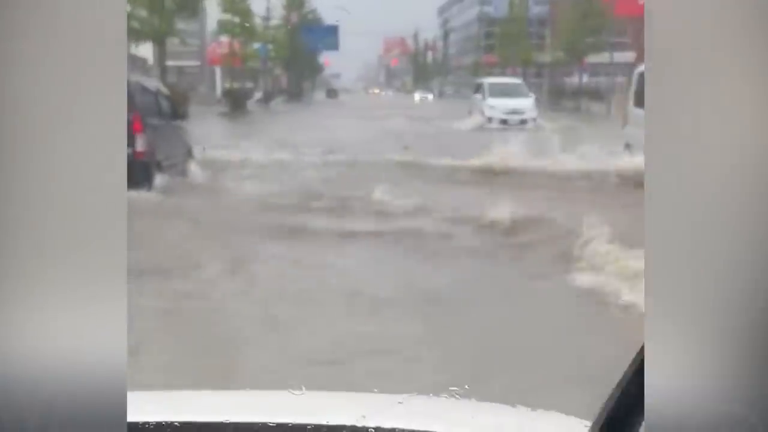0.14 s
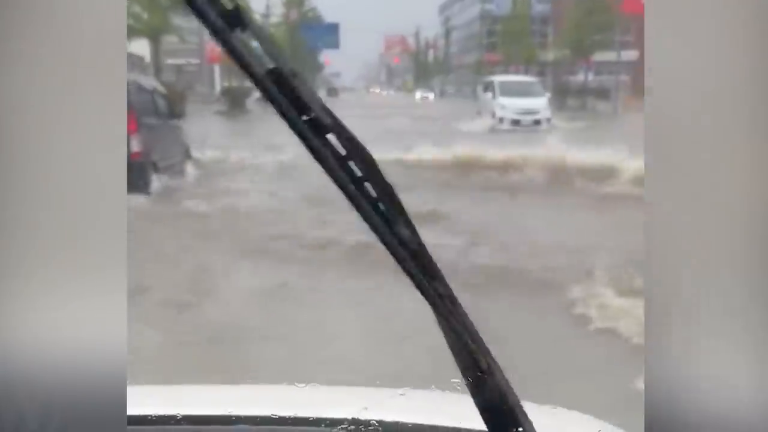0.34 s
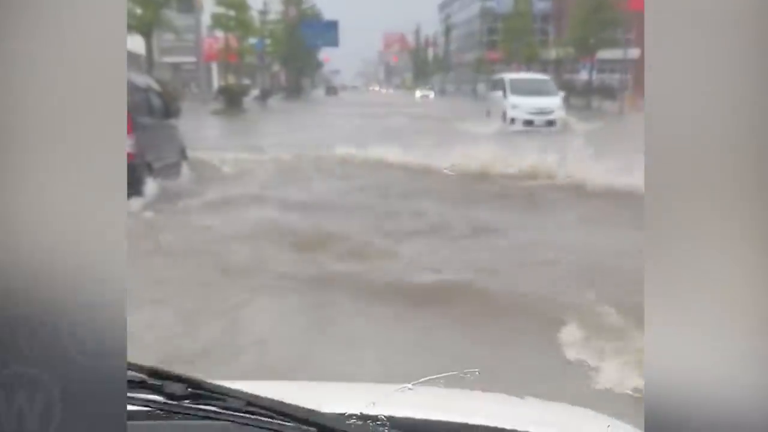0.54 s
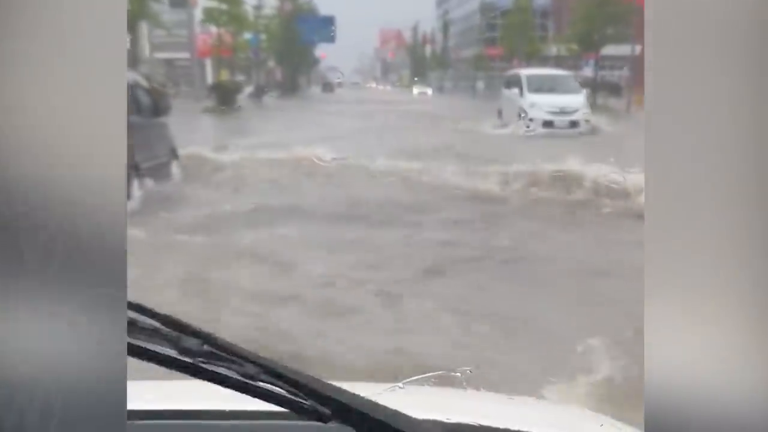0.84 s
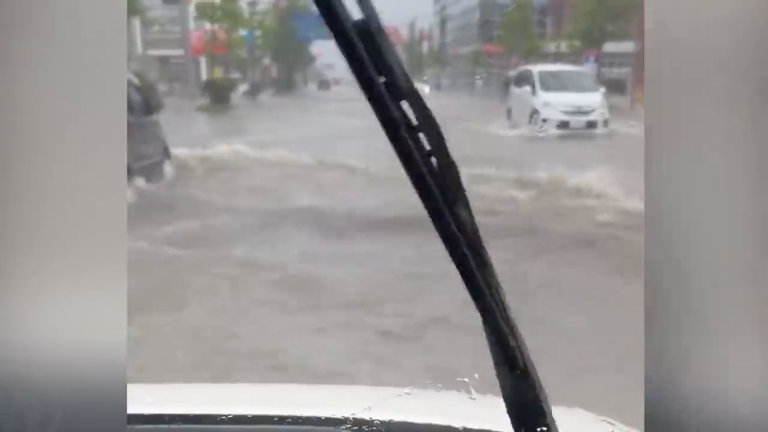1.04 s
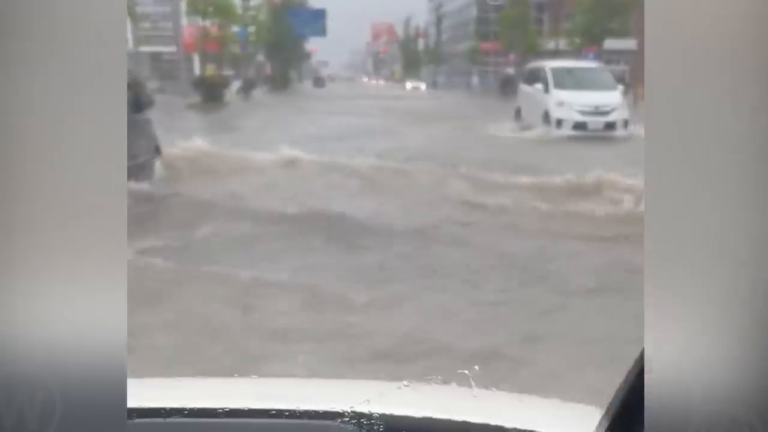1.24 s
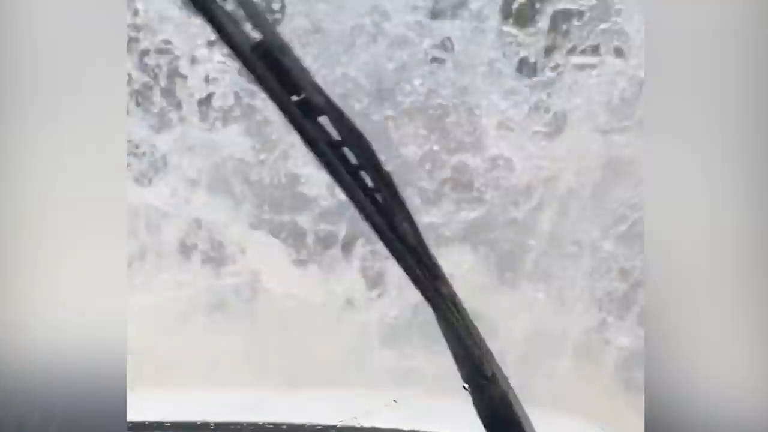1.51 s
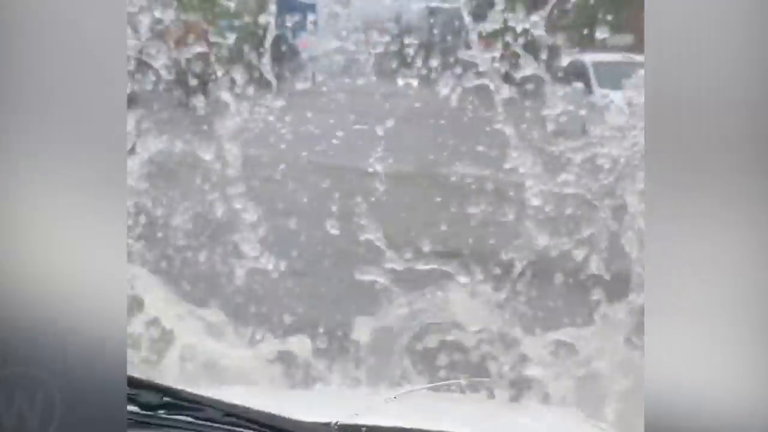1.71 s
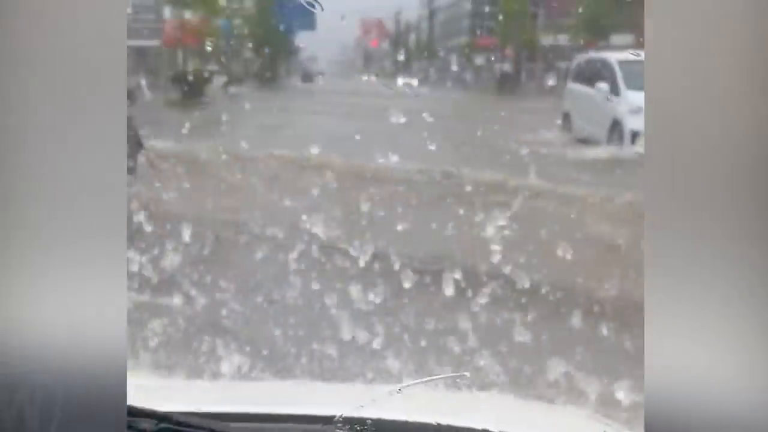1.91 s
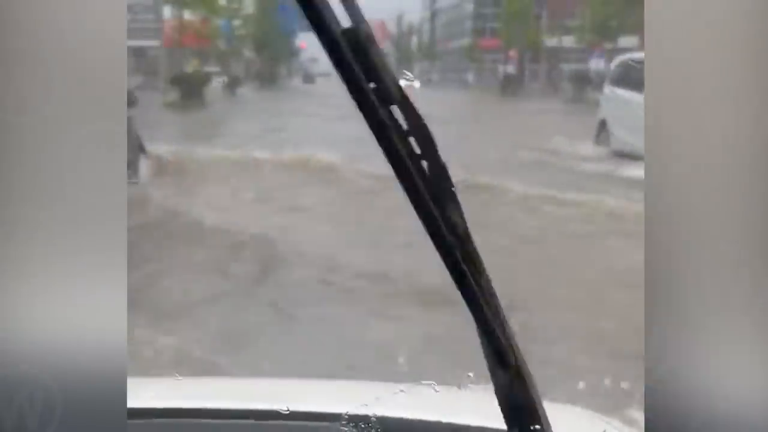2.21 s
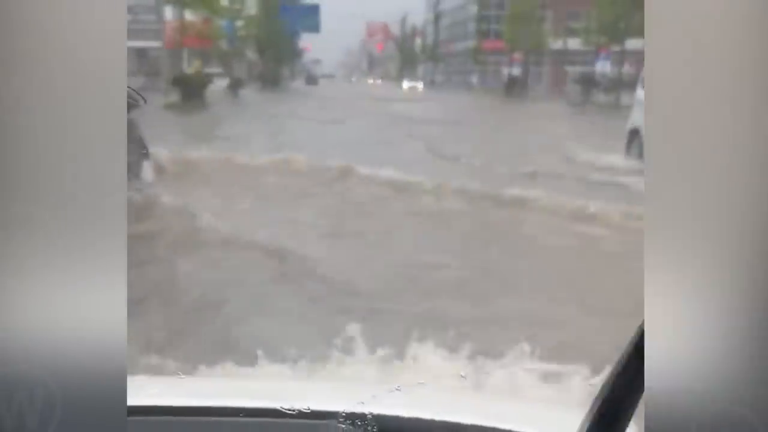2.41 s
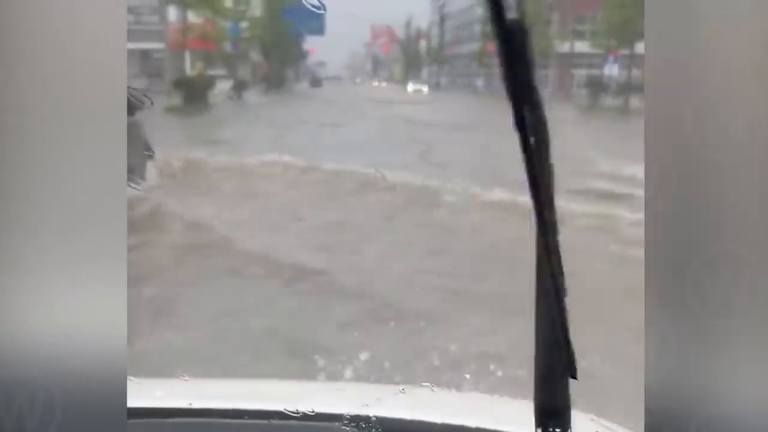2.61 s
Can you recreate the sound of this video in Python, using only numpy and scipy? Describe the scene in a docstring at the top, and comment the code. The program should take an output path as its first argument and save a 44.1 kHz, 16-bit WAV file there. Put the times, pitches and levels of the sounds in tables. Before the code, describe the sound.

Low, boomy rumble of a car driving through a flooded street, with water thumping the floor

```python
"""An engine drones under load and eases off, heard inside a car that wades through a flooded street.
It is a stack of sine waves. Water, made of filtered noise, rumbles under the floor pan and washes
through the wheel arches, and lumps of it thump the floor as short dying swings.
Midway a wave bursts over the bonnet and its spray patters on the windscreen as tiny ringing clicks.
Rain hisses on the glass, and a wiper blade squeals faintly at the start."""
import sys
import numpy as np
from scipy import signal
from scipy.fft import rfft, irfft, next_fast_len
from scipy.io import wavfile

SR = 44100
rng = np.random.default_rng(int(sys.argv[2]) if len(sys.argv) > 2 else 0)


def digitize_waveform(pressure):
    """Quantize a signal to 16-bit integers and store it at the path in sys.argv[1].

    Rows of a 2-D input are taken as channels; values are limited to [-1, 1].
    """
    field = np.atleast_2d(pressure).T
    bounded = np.clip(field, -1, 1)
    quanta = np.round(bounded * 32767).astype(np.int16)
    wavfile.write(sys.argv[1], SR, quanta)


N = 121275
T = np.arange(N) / SR   # time of every sample, s


def from_db(db):
    """Turn decibels into a gain."""
    return 10 ** (np.asarray(db) / 20)


def rms_one(x):
    """Scale a sound to an average strength (rms) of 1."""
    return x / np.sqrt(np.mean(x ** 2) + 1e-20)


def in_time(rows):
    """Join the points of a (time, value) table with straight lines, one value per sample."""
    return np.interp(T, *np.transpose(rows))


def at_hz(points, hz):
    """Read a (frequency, value) table with frequency on a log axis."""
    table_hz, values = np.transpose(points)
    return np.interp(np.log(hz), np.log(table_hz), values)


def drift(rate):
    """Slow random motion of spread 1, from noise smoothed twice; rate in Hz."""
    step, warm_up = 40, 2000   # one slow value per 40 samples; the first 2000 are dropped
    r = np.exp(-2 * np.pi * rate * step / SR)
    noise = rng.standard_normal(N // step + warm_up + 2)
    slow = rms_one(signal.lfilter([1], [1, -2 * r, r * r], noise)[warm_up:])
    return np.interp(np.arange(N) / step, np.arange(len(slow)), slow)


def swell(start, rise, hold, fall):
    """A level that rises in a straight line, holds and dies away exponentially; all times in s."""
    attack = np.clip((T - start) / rise, 0, 1)
    return attack * np.exp(-np.maximum(T - start - rise - hold, 0) / fall)


def water_noise(spectrum, patchy_db, surge_db, flicker_rate):
    """Stereo noise in third-octave bands that surge together and flicker each on its own; rms 1."""
    # spread of the sound between left and right: (frequency [Hz], side minus mid [dB])
    width = [(55, -37.5), (110, -28), (180, -23), (280, -11.5), (450, -12), (850, -6), (1700, -10),
             (2600, -4), (4200, -5.5), (5200, -9.5), (6000, -28), (12000, -27)]
    edges = 20 * 2 ** (np.arange(30) / 3)
    surge = surge_db * drift(flicker_rate / 2)
    white = rng.standard_normal((2, 2, N + SR // 4))   # two mid and side pairs, used by turns
    out = 0
    for k, (low, high) in enumerate(zip(edges, edges[1:])):
        if high < spectrum[0][0] or low > spectrum[-1][0]:
            continue
        hz = np.sqrt(low * high)
        band = signal.butter(2, [low, high], "band", fs=SR, output="sos")
        mid, side = signal.sosfilt(band, white[k % 2])[:, -N:]
        stereo = mid + from_db(at_hz(width, hz)) * side * [[1], [-1]]
        flicker = patchy_db * drift(flicker_rate)
        out = out + from_db(at_hz(spectrum, hz) + surge + flicker) * stereo
    return rms_one(out)


def resonant_noise(hz, width_hz):
    """Noise passed twice through one resonance, so that it gathers around a pitch; rms 1."""
    r = np.exp(-np.pi * width_hz / SR)
    a = [1, -2 * r * np.cos(2 * np.pi * hz / SR), r * r]
    once = signal.lfilter([1, 0, -1], a, rng.standard_normal(N))
    return rms_one(signal.lfilter([1, 0, -1], a, once))


def grains(per_s, low_hz, high_hz, cycles, spread_db, tilt_db, pan_db, count):
    """Random clicks of uneven size, each ringing at one of many pitches; tilt is per octave; rms 1."""
    born = np.flatnonzero(rng.random(N) < per_s / SR)
    size = from_db(spread_db * np.minimum(rng.exponential(1, N), 4)) * rng.choice([-1, 1], N)
    dealt = rng.integers(0, count, N)   # which pitch each click gets
    pan = pan_db * rng.standard_normal(N)
    out = 0
    for k, hz in enumerate(np.geomspace(low_hz, high_hz, count)):
        at = born[dealt[born] == k]
        clicks = np.full((2, N), 1e-18)   # not quite zero, which keeps the filter fast
        clicks[:, at] = size[at] * from_db(pan[at] * [[.5], [-.5]])
        w = 2 * np.pi * hz / SR
        r = np.exp(-np.log(1000) * hz / (cycles * SR))   # fades by 60 dB over the given cycles
        ringing = signal.lfilter([0, np.sin(w)], [1, -2 * r * np.cos(w), r * r], clicks)
        out = out + from_db(tilt_db * np.log2(hz / low_hz)) * ringing
    return rms_one(out)


def engine():
    """Sines at multiples of the firing rate: the lowest booms with load, the overtones growl and waver."""
    # engine speed before jitter: (time [s], firing rate [Hz])
    speed = [(0, 58.62), (.3, 60.15), (.72, 62.24), (.88, 57.26), (1.3, 57.23), (1.65, 56.21), (2.0, 57.4),
             (2.25, 51.89), (2.75, 53.19)]
    # engine load, heard in the lowest harmonic: (time [s], relative level [dB])
    load = [(0, -23), (.06, -20), (.14, -14.5), (.3, -20.5), (.45, -17.5), (.59, -19.5), (.65, -36),
            (.71, -32.5), (.76, -16.5), (.9, -25), (.99, -39), (1.06, -21.5), (1.25, -16.5), (1.35, -19),
            (1.49, -24), (1.62, -19.5), (1.76, -34), (1.99, -29.5), (2.2, -31.5), (2.43, -26), (2.75, -25)]
    # growl of the overtones: (time [s], relative level [dB])
    growl = [(0, -21), (.25, -18.5), (.6, -21.5), (1.0, -22.5), (1.25, -24), (1.65, -19.5), (1.85, -28),
             (2.75, -25.5)]
    # engine harmonics: (multiple of the firing rate, relative level [dB])
    harmonics = [(1, 0), (2, -11), (3, -12.5), (4, -20), (5, -32), (6, -35)]
    engine_db, waver_db = -1.5, 1.5
    firing_hz = in_time(speed) * (1 + 0.0074 * drift(10.1))   # uneven by 0.74 %
    phase = 2 * np.pi * np.cumsum(firing_hz) / SR
    out = 0
    for multiple, db in harmonics:
        level = in_time(load) if multiple == 1 else in_time(growl) + waver_db * drift(3.74)
        tone = np.sqrt(2) * np.sin(multiple * phase + 2 * np.pi * rng.random())   # rms 1
        out = out + from_db(engine_db + db + level) * tone
    return out


def floor_pan():
    """Churning water rumbles under the floor and roars along the sills; passing waves make the shell boom."""
    # water churning against the floor pan: (time [s], relative level [dB])
    buffet = [(0, -26.5), (.2, -25.5), (.6, -28), (.7, -27), (.92, -25), (1.3, -25), (1.65, -26),
              (1.85, -27), (2.15, -28), (2.3, -28), (2.42, -30.5), (2.6, -27), (2.75, -27)]
    # colour of the rumble: (frequency [Hz], relative level per Hz [dB])
    rumble_colour = [(40, -18.5), (55, -4.5), (72, 1), (100, 0.5), (140, -5.5), (190, -8.5), (270, -20.5),
                     (400, -33.5)]
    # waves heaving against the body: (time [s], level [dB])
    heave = [(0, -34.5), (.8, -34), (1.0, -35.5), (1.25, -30.5), (1.55, -32), (1.85, -34.5), (2.22, -35.5),
             (2.45, -31), (2.75, -30.5)]
    # colour of the boom: (frequency [Hz], relative level per Hz [dB])
    boom_colour = [(22, -23.5), (33, -13.5), (46, 2.5), (58, -3), (75, -12)]
    # water roaring along the sills: (time [s], level [dB])
    roar_level = [(0, -48.5), (.22, -35.5), (.65, -36), (.8, -37.5), (.95, -36.5), (1.15, -39.5),
                  (1.32, -41), (1.47, -37), (1.7, -37.5), (1.85, -42), (2.08, -39.5), (2.35, -41),
                  (2.62, -38.5), (2.75, -41.5)]
    # colour of the roar: (frequency [Hz], relative level per Hz [dB])
    roar_colour = [(190, -3.5), (240, 1), (310, -7), (410, -8.5), (520, -20)]
    rumble = water_noise(rumble_colour, patchy_db=0.0, surge_db=0.76, flicker_rate=12)
    boom = water_noise(boom_colour, patchy_db=3.0, surge_db=2.5, flicker_rate=4.8)
    roar = water_noise(roar_colour, patchy_db=0.5, surge_db=1.0, flicker_rate=14)
    out = from_db(0.96 + in_time(buffet)) * rumble
    out = out + from_db(in_time(heave)) * boom
    return out + from_db(in_time(roar_level)) * roar


def thumps():
    """Each lump of water pushes the floor pan, which swings a few cycles and dies."""
    # lumps of water hitting the floor pan: (time [s], pitch [Hz], peak level [dB])
    hits = [(.068, 139.5, -19), (.618, 165.4, -19), (0.753, 94.4, -16.5), (1.544, 77, -19.5),
            (1.682, 65, -14), (1.748, 130.5, -19.5), (1.924, 80.5, -18), (1.978, 58.16, -16),
            (2.057, 84, -21.5), (2.106, 68, -13.5), (2.268, 90, -21), (2.4, 56.4, -13), (2.458, 59.35, -14),
            (2.555, 95, -22), (2.587, 128, -18.5), (2.634, 78.7, -14.5), (2.7, 66, -21)]
    rise_s = 0.009
    out = 0
    for start, hz, db in hits:
        age = np.maximum(T - start, 0)
        push = age / rise_s * np.exp(1 - age / rise_s)   # reaches 1 after rise_s, then dies
        out = out + from_db(db) * push * np.sin(2 * np.pi * hz * age)
    return out


def wheel_arches():
    """A steady wash of noise, the ring of the arch as resonant noise, and bubbles gurgling as short rings."""
    # water flowing in the wheel arches: (time [s], relative level [dB])
    flow = [(0, -44.5), (.3, -44.5), (.6, -45), (.85, -44), (1.2, -44.5), (1.62, -44), (1.78, -45.5),
            (2.15, -46), (2.45, -48), (2.57, -46), (2.75, -43.5)]
    # colour of the wash: (frequency [Hz], relative level per Hz [dB])
    wash_colour = [(250, -5.5), (400, -1.5), (500, -0.5), (720, -1), (900, -5.5), (1100, -6.5), (1700, -10),
                   (2400, -18.5), (3500, -28.5), (5000, -23.5)]
    wash_db, ring_db, gurgle_db = 0.1, -13.5, -6
    wash = water_noise(wash_colour, patchy_db=1.5, surge_db=.5, flicker_rate=12.7)
    ring = resonant_noise(1083, width_hz=110)
    gurgle = grains(200, low_hz=296, high_hz=2340, cycles=20, spread_db=6.0, tilt_db=-7.0,
                    pan_db=5.5, count=22)
    mix = from_db(wash_db) * wash + from_db(ring_db) * ring + from_db(gurgle_db) * gurgle
    return from_db(in_time(flow)) * mix


def spray_burst():
    """The wave's spray arrives, holds and runs off."""
    return swell(1.27, rise=0.07, hold=0.13, fall=.05)


def wave():
    """A wave breaks over the car: fine spray, a dull pour on the bonnet and a soft slap on the glass."""
    # colour of the fine spray: (frequency [Hz], relative level per Hz [dB])
    spray_colour = [(1000, 4), (1600, 8.5), (2500, 2), (4500, 1.5), (8000, -6.5), (13000, -12)]
    # colour of the bulk pouring over the bonnet: (frequency [Hz], relative level per Hz [dB])
    pour_colour = [(200, 2), (300, 1), (480, -1), (680, 3), (1000, -12), (1600, -15), (2500, -25.5)]
    # colour of the crest slapping the glass: (frequency [Hz], relative level per Hz [dB])
    slap_colour = [(200, 1), (350, 2), (700, -9), (1500, -5), (3000, -10), (6000, -22), (12000, -30)]
    spray_db, pour_db, slap_db = -54, -43, -43.5
    spray = water_noise(spray_colour, patchy_db=1.0, surge_db=.7, flicker_rate=40)
    pour = water_noise(pour_colour, patchy_db=1.0, surge_db=.7, flicker_rate=40)
    slap = water_noise(slap_colour, patchy_db=1.0, surge_db=.7, flicker_rate=40)
    out = from_db(spray_db) * spray_burst() * spray
    out = out + from_db(pour_db) * swell(1.35, rise=0.03, hold=0.18, fall=0.06) * pour
    return out + from_db(slap_db) * swell(1.472, rise=.022, hold=0, fall=0.028) * slap


def splashes():
    """Sheets of water slap the body, each a short burst of noise around its own pitch."""
    # splashes against the body: (time [s], centre frequency [Hz], level [dB])
    slaps = [(.09, 1500, -53), (0.921, 520, -46), (1.40, 1279, -52), (1.41, 680, -43), (1.453, 289, -36.5),
             (1.514, 776, -47), (1.536, 285, -39.5), (1.575, 720, -45.5), (1.68, 710, -48.5),
             (2.14, 3000, -58), (2.52, 1379, -51), (2.565, 750, -45), (2.671, 890, -54)]
    out = 0
    for start, hz, db in slaps:
        burst = swell(start, rise=.006, hold=0.0076, fall=.018)
        out = out + from_db(db) * burst * resonant_noise(hz, width_hz=0.66 * hz)
    return out


def windscreen():
    """Rain hisses and ticks on the glass; the ticks crowd together while the spray lands."""
    # rain and spray hissing on the glass: (time [s], relative level [dB])
    hiss_level = [(0, 0), (.25, -1), (.6, -1), (.82, 0), (1.2, 0.8), (1.7, -0.5), (2.15, -0.5), (2.3, -1),
                  (2.75, -1)]
    # colour of the hiss: (frequency [Hz], relative level per Hz [dB])
    hiss_colour = [(1500, -12.5), (2100, -1.5), (2650, 2.5), (3200, -3), (3900, -4.5), (4700, -3),
                   (6000, -10.5), (8000, -10), (10500, -22), (12500, -17.5), (15000, -21)]
    hiss_db, drops_db = -55.5, -72
    hiss = water_noise(hiss_colour, patchy_db=1.0, surge_db=.5, flicker_rate=10)
    drops_per_s = 450 * (1 + 6.2 * spray_burst())   # the spray adds up to 6.2 times the rain's drops
    drops = grains(drops_per_s, low_hz=2000, high_hz=8000, cycles=14, spread_db=3.5, tilt_db=0,
                   pan_db=1, count=14)
    return from_db(hiss_db + in_time(hiss_level)) * hiss + from_db(drops_db) * drops


def wiper():
    """The blade ends its sweep: a broad rub over wet glass, and a squeal of a few narrow resonances."""
    # resonances of the blade: (frequency [Hz], relative level [dB])
    resonances = [(2830, -4.5), (3700, 0.5), (4480, -5)]
    rub_db, squeal_db = -56.5, -65
    rub = swell(0, rise=0.0054, hold=0, fall=0.07) * resonant_noise(3080, width_hz=2600)
    squeal = 0
    for hz, db in resonances:
        squeal = squeal + from_db(squeal_db + db) * resonant_noise(hz, width_hz=70)
    return from_db(rub_db) * rub + swell(0, rise=0.0054, hold=.2, fall=.015) * squeal


def microphone_ports(pair):
    """The two ports hear each pitch with a phase and level difference of their own."""
    # phase between the ports: (frequency [Hz], lead of left over right [radians])
    port_phase = [(0, 0), (100, -.02), (170, -.1), (330, -.5), (520, -.6), (900, -.25), (1250, -.4),
                  (1850, .2), (2450, 1.9), (3000, 2.0), (4000, .8), (4600, 1.9), (5100, 1.6), (5950, 3.14),
                  (7600, 6.1), (8800, 6.9), (10200, 9.4), (12000, 12.3), (14000, 13.8)]
    # balance of the ports: (frequency [Hz], left minus right [dB])
    port_balance = [(90, 0), (220, -0.69), (430, 0.83), (1160, .8), (2500, -1), (5000, -1), (8300, 0.21)]
    size = next_fast_len(N + SR // 4)
    hz = np.fft.rfftfreq(size, 1 / SR) + 1e-3   # just above 0, so that its log exists
    lead = np.interp(hz, *np.transpose(port_phase))
    balance = at_hz(port_balance, hz)
    left = from_db(balance / 2)
    right = from_db(-balance / 2) * np.exp(-1j * lead)
    return irfft(rfft(pair, size) * np.array([left, right]), size)[:, :N]


def scene():
    """Everything as heard from the front seat; engine and thumps are the same in both ears."""
    water = floor_pan() + wheel_arches() + wave() + splashes()
    glass = windscreen() + wiper()
    return engine() + thumps() + microphone_ports(water + glass)


def record(dry):
    """A steep low-pass filter cuts the top: 70 dB down from 15620 Hz upward."""
    return signal.sosfilt(signal.cheby2(12, 70, 15620, fs=SR, output="sos"), dry)


dry = scene()
out = record(dry)
digitize_waveform(out)
```